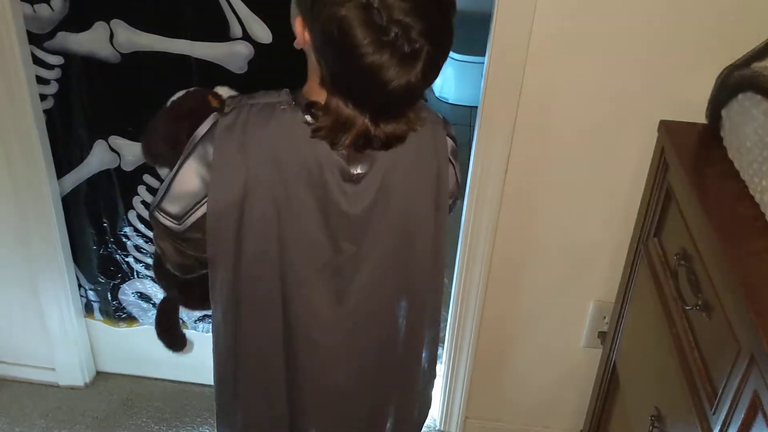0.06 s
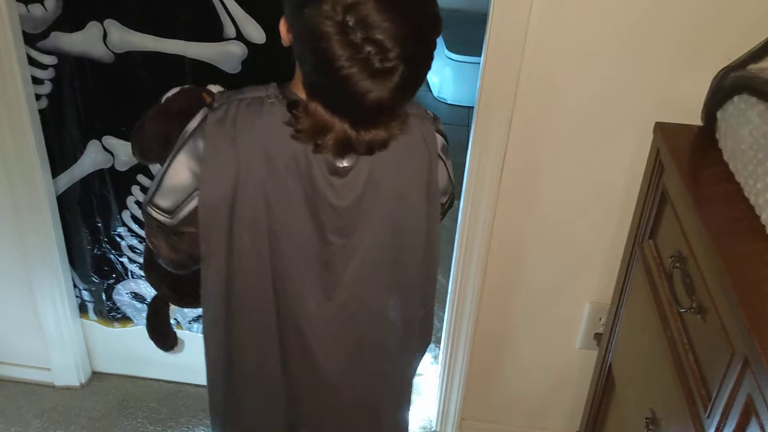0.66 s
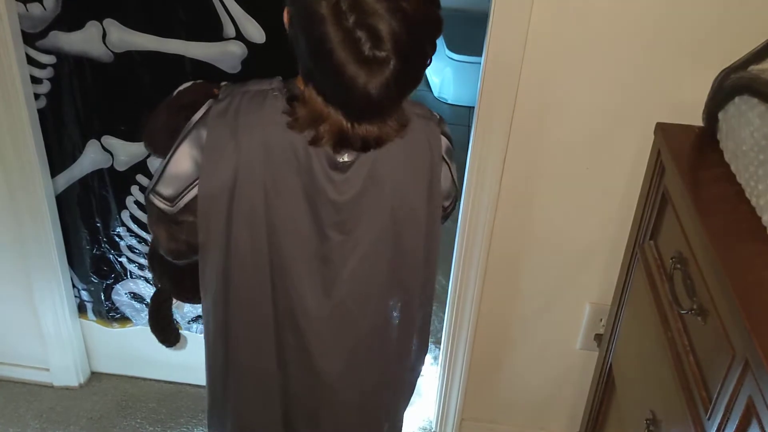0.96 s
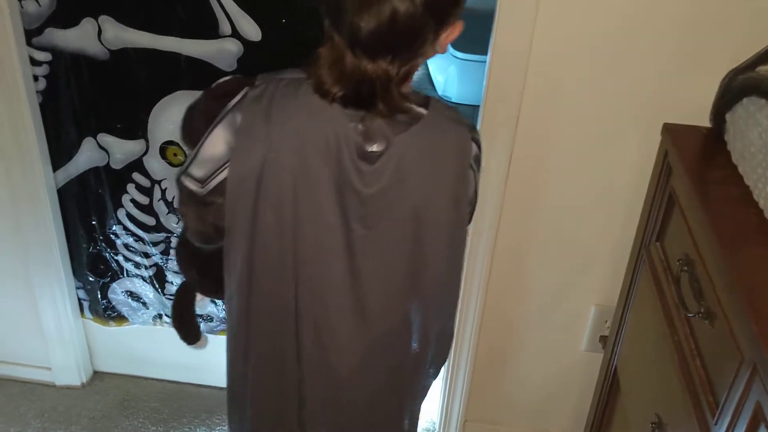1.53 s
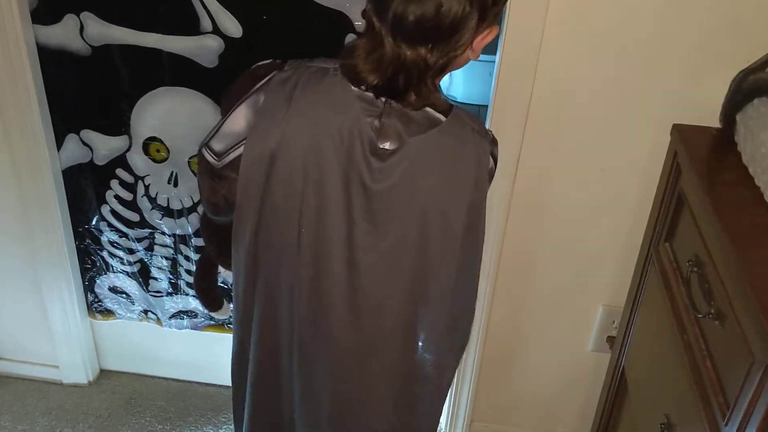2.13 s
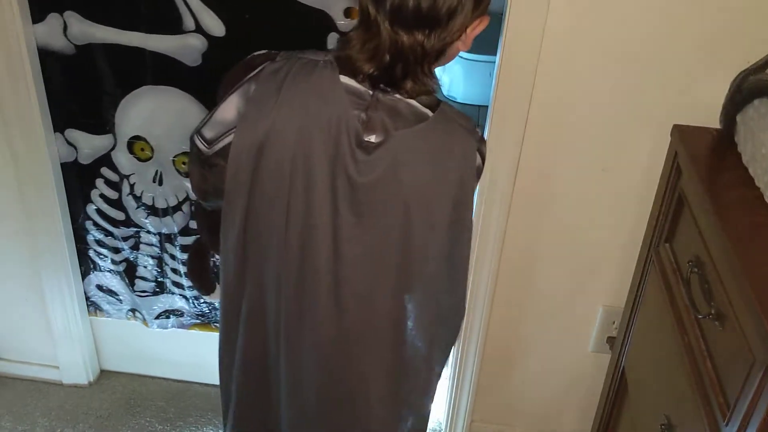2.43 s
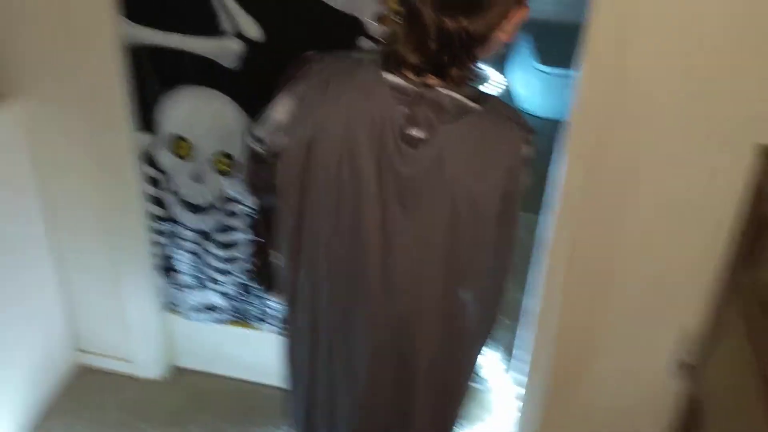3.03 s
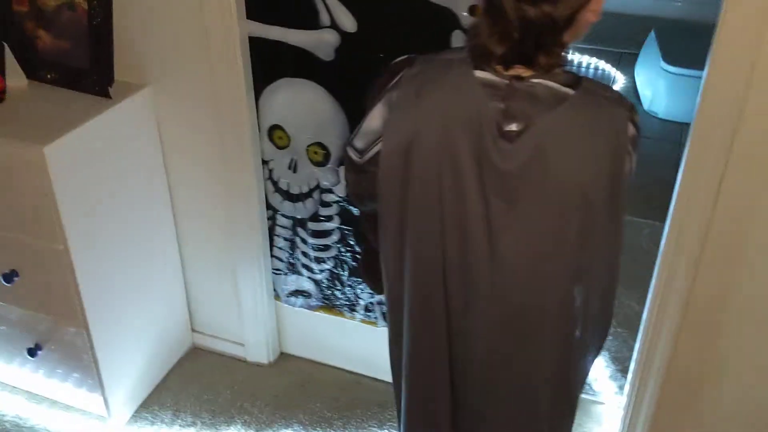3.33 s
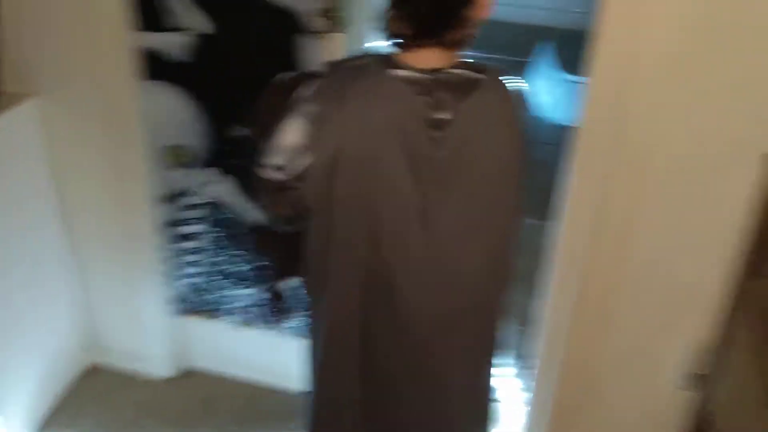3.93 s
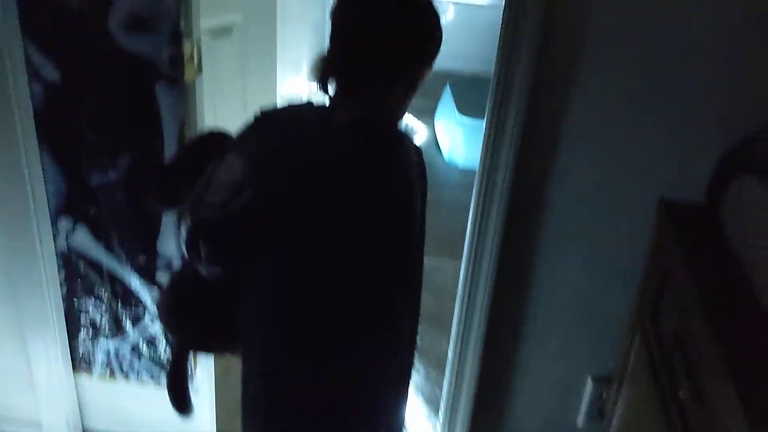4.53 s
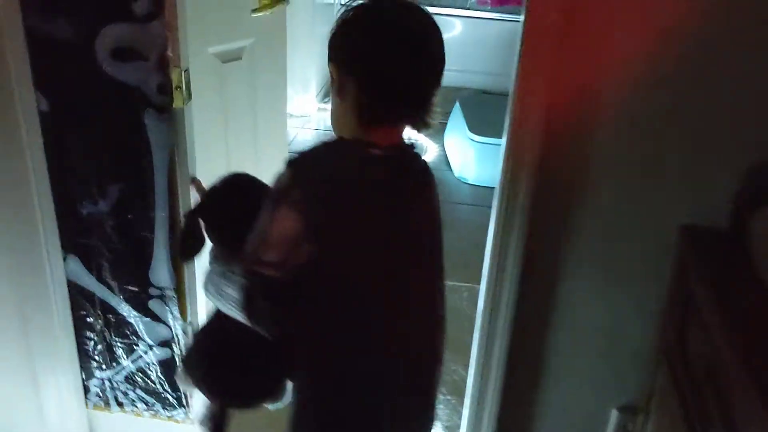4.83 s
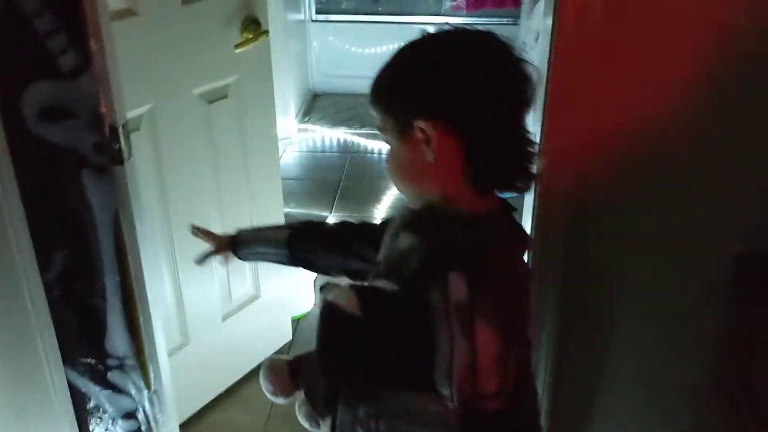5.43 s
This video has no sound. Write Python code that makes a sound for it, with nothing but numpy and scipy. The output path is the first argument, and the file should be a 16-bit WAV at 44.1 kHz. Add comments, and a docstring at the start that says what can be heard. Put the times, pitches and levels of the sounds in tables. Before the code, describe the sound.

Close handling noise, with rubs, clicks and hollow bumps, surrounds a few faint taps on a wooden door over a low house rumble.

```python
"""A quiet hallway, heard from the two microphone ports of a hand-held camera, over a low house rumble.
At once, very close, fingers rub past the right port, skin squeaks and clothes swish; then nails tick
and the hand knocks the case. From 1.5 to 3.7 s, farther off, a child taps faintly on a wooden door,
each tap carrying the hallway's echo. From about 4.6 s the handling grows busy: a fingertip judders
on the case, and the knocks and ticks are hardest just after 5 s."""
import sys
import numpy as np
from scipy import signal
from scipy.fft import rfft, irfft, next_fast_len
from scipy.io import wavfile
from scipy.ndimage import map_coordinates

SR = 44100
rng = np.random.default_rng(int(sys.argv[2]) if len(sys.argv) > 2 else 0)


def persist_wave(psi):
    """Save psi, clipped to +-1, as 16-bit WAV."""
    counts = np.round(np.clip(psi, -1, 1) * 32767).astype(np.int16)
    wavfile.write(sys.argv[1], SR, np.atleast_2d(counts).T)


N = 246145

# the hallway's rumble and hiss over time: time_s, level_db
ROOM_LEVEL = [(0, -54.5), (1.8, -57), (2.4, -55), (3, -55.5), (3.5, -53.5), (5.5, -52)]
# its spectrum: frequency_hz, gain_db
ROOM_SPECTRUM = [(15, -14.5), (35, -5), (56, 2), (85, -11), (125, -14), (200, -15.5), (280, -9), (380, -22),
                 (520, -19), (900, -20.5), (2000, -28), (3500, -28), (7000, -37), (16000, -39)]
# how alike it is at the two ports: frequency_hz, correlation
ROOM_LIKENESS = [(60, 0.98), (130, 0.99), (290, 0.3), (640, 0), (15000, 0)]
# skin sliding on the case: start_s, length_s, hiss_db, scrape_db, drag_db, swell_db
FINGER_STROKES = [(0, 0.11, -56.5, -48, -53, -5.5), (0.132, 0.013, -40, -32.5, -56, 0.5),
                  (0.168, 0.22, -43, -41.5, -44.5, -3.5), (0.397, 0.043, -53.5, -61, -48, -7),
                  (0.705, 0.043, -52.5, -48.5, -44, -15), (0.856, 0.23, -61, -63, -57.5, 1),
                  (1.197, 0.14, -51.5, -56, -55, 14), (1.325, 0.41, -58, -54.5, -52.5, -4.5),
                  (1.455, 0.027, -52.5, -56, -43.5, -3), (1.801, 0.093, -63, -59, -65, -6),
                  (3.587, 0.025, -54, -47, -39.5, -6), (3.67, 0.079, -62, -56.5, -45, -6),
                  (3.752, 0.11, -51.5, -52, -54, 11.5), (3.941, 0.035, -50.5, -54, -54, -3),
                  (4.072, 0.095, -48, -57.5, -48.5, 4), (4.22, 0.12, -50.5, -59, -54, 1),
                  (4.395, 0.26, -55.5, -60.5, -53, 10.5), (4.999, 0.055, -56, -49, -34.5, 0),
                  (5.077, 0.031, -46, -48, -44, 7), (5.16, 0.039, -44.5, -50, -36.5, 1.5),
                  (5.227, 0.024, -39.5, -38, -31, -6), (5.266, 0.019, -36, -26.5, -21.5, -13),
                  (5.287, 0.087, -45, -49.5, -36.5, -6), (5.421, 0.042, -53.5, -55, -32, 8),
                  (5.535, 0.057, -47, -65, -44, 5)]
# spectra of skin hissing at the port, scraping the shell and dragging the case: frequency_hz, gain_db
HISS_SPECTRUM = [(900, -30), (1900, -7.5), (2700, 2.5), (3900, 2.5), (4800, -1), (5700, -0.5), (6700, -6.5),
                 (7800, -5.5), (9700, -5.5), (13000, -2.5), (16000, -5.5)]
SCRAPE_SPECTRUM = [(200, -33), (430, 15), (600, 7), (900, 7), (1200, 0.5), (1700, -1.5), (2200, -7.5),
                   (4000, -21.5)]
DRAG_SPECTRUM = [(30, -8), (70, -4.5), (120, -2), (170, -5), (280, -3), (420, 1), (600, -18), (1000, -69)]
# narrow resonances of the camera's shell: centre_hz, width_hz, boost_db
SHELL_RESONANCES = [(957, 56, 3), (1230, 20, -9), (1610, 140, 5.5), (1810, 29, 0), (2424, 280, 5),
                    (2980, 410, 2.5), (4100, 980, 2.5), (5680, 700, 8.5), (7480, 940, 8), (9650, 1120, 9),
                    (11720, 240, 9)]
# case vibration at the left port, relative to the right: frequency_hz, gain_db
LEFT_PORT_GAIN = [(60, -5), (400, -3.5), (700, -4.5), (1000, -10), (1400, -8.5), (2400, -22.5), (8000, -42)]
# its phase lead at the left port: frequency_hz, lead_rad
LEFT_PORT_LEAD = [(40, 1.14), (90, 1.76), (200, 2.155), (420, 2.495), (700, 2.07), (1000, 1.15),
                  (1400, 0.01)]
# a faint squeak of skin: time_s, level_db
SQUEAK_LEVEL = [(0, -51), (.022, -43.5), (.05, -55), (.11, -51), (.14, -67), (.2, -120)]
# its resonances: centre_hz, half_width_hz, gain_db
SQUEAK_RESONANCES = [(1105, 74, 2), (1460, 110, -2), (2510, 87, -5), (4100, 84, -4), (4430, 57, -22),
                     (5280, 55, -6)]
# clothes moving close to both ports: start_s, length_s, level_db, fizz_share
CLOTH_SWISHES = [(0, 0.12, -59, 0), (3.016, 0.31, -61, 0.3), (3.788, 0.07, -48.5, 0.53),
                 (3.933, 0.04, -64, 0.05), (4.079, 0.093, -54, 0.2), (4.19, 0.15, -60, 0.25),
                 (4.375, 0.2, -65, 0.15), (5.037, 0.11, -52.5, 0.15), (5.16, 0.14, -50, 0.2),
                 (5.258, 0.06, -45, 0.1), (5.4, 0.05, -60, 0.1), (5.54, 0.044, -51.5, 0.1)]
# spectra of soft fabric and of the fizz of quickly sliding cloth: frequency_hz, gain_db
CLOTH_SPECTRUM = [(500, 23), (1800, -15), (3600, 12), (4800, -5), (5700, 2.5), (6800, 3), (9700, 1.5),
                  (13000, 0), (16000, -6)]
FIZZ_SPECTRUM = [(2000, -30), (5000, -11), (7000, -2), (9000, 3), (13000, -2), (16000, -3)]
# hard little contacts of nail and plastic: start_s, level_db, left_minus_right_db, ping_hz
NAIL_TICKS = [(0.1465, -31.5, -29, 2900), (0.18, -38, -25, 2530), (0.268, -31.5, -33, 7900),
              (0.7125, -37.5, -18.6, 2573), (0.779, -63, 12, 9800), (0.812, -65, 11, 9400),
              (1.3268, -31, -22, 1980), (1.555, -45, -11, 3060), (1.81, -47, -24, 2793),
              (3.2946, -46, 0, 3070), (3.5802, -30.5, -11, 2070), (3.5913, -33.5, -21, 2800),
              (3.629, -46, -20, 3840), (3.8724, -43, -2, 5652), (4.208, -43.5, -15, 2600),
              (4.6677, -39.5, -26, 8800), (4.7509, -37.5, -7, 7800), (4.7547, -35.5, -25, 7800),
              (4.9056, -40, -23, 2440), (5.2276, -26, -12, 8660), (5.233, -29, -17, 2520),
              (5.271, -14.5, -29, 7570), (5.3948, -14, -11, 3920), (5.398, -26.5, -23, 3860),
              (5.41, -37, -13, 3130), (5.5114, -33.5, -27, 5540)]
# spectrum of their crack: frequency_hz, gain_db
TICK_SPECTRUM = [(300, -64), (1200, -6), (2000, -0.5), (2700, 0), (3900, 3.5), (4700, -4), (5700, -1.5),
                 (8000, -6), (10000, -1.5), (13000, -8), (16000, -11)]
# the hand knocking the case: start_s, ring_db, ring_hz, thump_db, rap_db, rap_hz
CASE_KNOCKS = [(0.703, -38, 205, -46, -56, 890), (0.708, -68, 210, -43, -35, 1060),
               (0.944, -43, 283, -40.5, -45.5, 820), (1.324, -24, 270, -30.5, -47, 855),
               (1.343, -26.5, 303, -37, -51, 683), (1.351, -26.5, 362, -58, -47, 935),
               (1.47, -38.5, 410, -46, -49, 760), (3.578, -30, 513, -26.5, -39.5, 683),
               (3.592, -36.5, 370, -40, -54, 683), (3.63, -34.5, 392, -37, -43, 690),
               (3.728, -40.5, 254, -45, -51, 880), (3.874, -36, 257, -36, -55, 706),
               (4.564, -38.5, 263, -56, -50, 683), (4.633, -40, 265, -35, -51, 683),
               (4.661, -23.5, 298, -37, -33.5, 810), (4.672, -26, 285, -29, -47, 834),
               (4.907, -19.5, 400, -32, -32, 770), (4.917, -33, 308, -30.5, -52, 850),
               (5.147, -31.5, 342, -40, -36, 744), (5.231, -15.5, 360, -39, -27.5, 750),
               (5.238, -23, 300, -30, -29.5, 694), (5.27, -21, 386, -36, -27, 880),
               (5.4, -22, 305, -28, -44, 910), (5.416, -22.5, 288, -24.5, -48, 850),
               (5.511, -34.5, 346, -47, -49, 716)]
# modes of the case in the hand: pitch_hz, level_db, t60_s
CASE_MODES = [(66.2, 11.5, 0.31), (94.2, 12, 0.12), (123.6, 14.5, 0.19), (189, -5, 0.24), (206.8, -6, 0.11),
              (251.2, -1, 0.14), (290.2, -10.5, 0.16), (333.7, -6, 0.095), (394, 0, 0.035),
              (442, -1, 0.056), (491, -2.5, 0.05), (563.7, -2.5, 0.094), (657, 5, 0.017), (707, 3, 0.063),
              (868, -4.5, 0.12), (901, 4, 0.051), (1082, -3.5, 0.055), (1277, 2.5, 0.045),
              (1590, 8.5, 0.036)]
# the child's taps, away from the microphone: start_s, level_db
DOOR_TAPS = [(1.546, -56), (1.651, -49), (1.81, -50), (1.885, -57), (2.368, -53), (2.803, -56.5),
             (3.296, -70), (3.679, -53.5)]
# spectrum of the wooden panel: frequency_hz, gain_db
DOOR_SPECTRUM = [(150, -35), (350, -3.5), (500, 11.5), (700, -8.5), (1000, 8.5), (1500, -30),
                 (3000, -12.5), (8000, -24.5), (16000, -38)]
# decay of the hallway's echo: frequency_hz, t60_s
HALLWAY_DECAY = [(150, 1), (1000, 0.4), (4000, 0.14), (12000, 0.49)]
# a fingertip sticking and slipping on the case: start_s, length_s, slip_hz, level_db
FINGER_JUDDERS = [(4.696, 0.029, 270, -39.5), (4.798, 0.01, 277, -32.5), (4.878, 0.015, 260, -35.1),
                  (5.005, 0.0061, 323, -24), (5.029, 0.0052, 345.5, -21), (5.037, 0.012, 285, -24.2),
                  (5.108, 0.012, 282, -30), (5.145, 0.016, 355.7, -22.5), (5.278, 0.017, 421, -21.5),
                  (5.359, 0.027, 343, -34), (5.434, 0.014, 351, -25.5), (5.458, 0.0079, 330, -30),
                  (5.497, 0.027, 407, -41.5)]


def amp(db):
    """Decibels to gain."""
    return 10 ** (np.asarray(db) / 20)


def unit(x):
    """x at rms 1."""
    return x / np.sqrt(np.mean(x ** 2) + 1e-20)


def burst(x, seconds):
    """x with the energy of an rms-1 sound of that length."""
    return x * np.sqrt(seconds * SR / (np.sum(x ** 2) + 1e-20))


def fade(t, t60):
    """Exponential decay, 60 dB in t60 seconds."""
    return np.exp(-np.log(1000) * t / t60)


def along(points, hz):
    """Read (frequency_hz, value) points at hz, on a log axis."""
    frequencies, values = np.transpose(points)
    return np.interp(np.log(hz + 1), np.log(frequencies + 1), values)


def gain_curve(points):
    """One gain per sample from (time_s, level_db) points."""
    return amp(np.interp(np.arange(N) / SR, *np.transpose(points)))


def wobble(rate):
    """A smooth random curve, rate knots a second."""
    knots = rng.standard_normal(int(N * rate / SR) + 4)
    return map_coordinates(knots, [np.arange(N) * rate / SR])


def filtered(x, response):
    """x through a complex response of frequency."""
    n = x.shape[-1]
    padded = next_fast_len(n + SR // 8)
    hz = np.fft.rfftfreq(padded, 1 / SR)
    return irfft(rfft(x, padded) * response(hz), padded)[..., :n]


def coloured(x, spectrum):
    """x shaped by a spectrum, at rms 1."""
    return unit(filtered(x, lambda hz: amp(along(spectrum, hz))))


def add(track, start_s, sound):
    """Mix a sound into the track at start_s."""
    start = round(start_s * SR)
    span = track[..., start:start + sound.shape[-1]]
    span += sound[..., :span.shape[-1]]


def peak(hz, centre_hz, width_hz):
    """A resonance's bell, 1 at its centre."""
    return 1 / (1 + (2 * (hz - centre_hz) / width_hz) ** 2)


def shell_db(hz):
    """Boost of the shell's narrow resonances."""
    return sum(db * peak(hz, centre, width) for centre, width, db in SHELL_RESONANCES)


def friction(spectrum, grain_db, grain_rate):
    """Tiny slips of uneven strength, coloured by the shell's resonances."""
    slips = rng.standard_normal(N) * amp(grain_db * wobble(grain_rate))
    return unit(filtered(slips, lambda hz: amp(along(spectrum, hz) + shell_db(hz))))


def stroke(length_s, attack_s, swell_db, t60):
    """Envelope of one slide: it takes hold, swells or eases while it lasts, then dies away."""
    t = np.arange(SR) / SR
    onset = np.clip(t / attack_s, 0, 1)
    progress = np.clip(t / length_s, 0, 1)
    return onset * amp(swell_db * (progress - .5)) * fade(np.maximum(t - length_s, 0), t60)


def room_tone():
    """House rumble fills the hallway, alike at both ports, under a faint hiss that differs at each."""
    def mid_and_side(hz):
        angle = np.arccos(np.clip(along(ROOM_LIKENESS, hz), -1, 1)) / 2
        return np.array([np.cos(angle), np.sin(angle)])

    noise = coloured(rng.standard_normal((2, N)), ROOM_SPECTRUM)
    mid, side = filtered(noise, mid_and_side)
    return gain_curve(ROOM_LEVEL) * unit(np.array([mid + side, mid - side]))


def finger_rubbing(grip_s=0.0066, grip_share=0.044, pressure_swing_db=1.0):
    """Sliding skin hisses right at the port, scrapes on the shell and drags the whole case."""
    hiss, scrape, drag = np.zeros((3, N))
    for start_s, length_s, hiss_db, scrape_db, drag_db, swell_db in FINGER_STROKES:
        attack_s = grip_s + grip_share * length_s
        add(hiss, start_s, amp(hiss_db) * stroke(length_s, attack_s, swell_db, t60=0.08))
        add(scrape, start_s, amp(scrape_db) * stroke(length_s, attack_s, swell_db, t60=0.091))
        add(drag, start_s, amp(drag_db) * stroke(length_s, attack_s, swell_db, t60=0.19))
    pressure = amp(pressure_swing_db * wobble(rate=45))
    return pressure * (hiss * friction(HISS_SPECTRUM, grain_db=1.8, grain_rate=500)
                       + scrape * friction(SCRAPE_SPECTRUM, grain_db=2.0, grain_rate=170)
                       + drag * friction(DRAG_SPECTRUM, grain_db=2.0, grain_rate=78))


def skin_squeak():
    """Dry skin on the case sings briefly in a few narrow resonances."""
    def resonances(hz):
        return sum(amp(db) * peak(hz, centre, 2 * half) for centre, half, db in SQUEAK_RESONANCES)

    return gain_curve(SQUEAK_LEVEL) * unit(filtered(rng.standard_normal(N), resonances))


def clothes(stir_db=-66.5, stir_swing_db=5.5, right_db=-2):
    """Fabric close to the microphone never lies quite still, and now and then swishes."""
    soft = amp(stir_db + stir_swing_db * wobble(rate=3.52))
    bright = np.zeros(N)
    for start_s, length_s, level_db, fizz_share in CLOTH_SWISHES:
        swish = amp(level_db) * stroke(length_s, attack_s=0.24 * length_s, swell_db=4, t60=0.1)
        add(soft, start_s, swish)
        add(bright, start_s, fizz_share * swish)
    left, right = (soft * friction(CLOTH_SPECTRUM, grain_db=5, grain_rate=400)
                   + bright * friction(FIZZ_SPECTRUM, grain_db=4, grain_rate=400) for _ in range(2))
    return np.array([left, amp(right_db) * right])


def nail_ticks(rattle_db=-21, ping_db=-5, slope_db_per_octave=3, shell_share=0.56):
    """A nail meets plastic, mostly nearer the right port: a sharp crack, a brief ping and a rattle."""
    out, t = np.zeros((2, N)), np.arange(SR // 12) / SR
    envelope = fade(t, t60=0.0056) + amp(rattle_db) * fade(t, t60=0.079)
    for start_s, level_db, left_db, ping_hz in NAIL_TICKS:
        def colour(hz):
            off_ping_db = slope_db_per_octave * np.abs(np.log2((hz + 1) / ping_hz))
            return amp(along(TICK_SPECTRUM, hz) + shell_share * shell_db(hz) - off_ping_db)

        cracks = filtered(rng.standard_normal((2, len(t))) * envelope, colour)
        ping = amp(ping_db) * unit(np.sin(2 * np.pi * ping_hz * t) * fade(t, t60=0.0085))
        left, right = (burst(unit(crack) + ping, seconds=0.002) for crack in cracks)
        add(out, start_s, amp(level_db) * np.array([amp(left_db) * left, right]))
    return out


def case_knocks(thump_below_hz=160, rap_above_hz=620, focus_per_octave=1.42, attack_s=0.00051,
                scatter_db=2, detune=0.0272, tail_db=-26):
    """The hand knocks the case: a thump, with a hollow ring and a short rap that depend on the spot."""
    out, t = np.zeros(N), np.arange(SR // 3) / SR
    hz, mode_db, t60 = np.transpose(CASE_MODES)
    thump, rap = hz < thump_below_hz, hz > rap_above_hz
    ring = ~thump & ~rap
    onset = 1 - np.exp(-(t / attack_s) ** 2)
    low_tail = amp(tail_db) * np.outer(~rap, fade(t, t60=0.64))
    decay = fade(t, t60[:, None]) + low_tail
    for start_s, ring_db, ring_hz, thump_db, rap_db, rap_hz in CASE_KNOCKS:
        size, pitch, offset = rng.standard_normal((3, len(hz)))
        # the spot favours the modes near its own pitch; the grip detunes them
        centre_hz = np.where(thump, hz, np.where(ring, ring_hz, rap_hz))
        nearness = np.exp(-(focus_per_octave * np.log2(hz / centre_hz)) ** 2)
        gain = amp(mode_db + scatter_db * size) * nearness
        phase = 2 * np.pi * np.outer(hz * (1 + detune * pitch), t)
        # all modes are pushed the same way at first, then each goes its own way
        push = 0.33 * np.sin(phase) * fade(t, t60=0.0086)
        ringing = np.sin(phase + np.pi * offset[:, None]) * decay
        modes = gain[:, None] * (push + ringing) * onset
        for group, level_db in ((thump, thump_db), (ring, ring_db), (rap, rap_db)):
            add(out, start_s, amp(level_db) * burst(modes[group].sum(axis=0), seconds=0.017))
    return out


def door_taps(echo_db=-2):
    """A child taps the wooden panel some way off; each tap arrives with the hallway's echo."""
    out = np.zeros((2, N))
    for start_s, level_db in DOOR_TAPS:
        hz, frame_s, bands = signal.stft(rng.standard_normal((2, SR // 2)), SR, nperseg=256)
        band_decay = fade(frame_s, along(HALLWAY_DECAY, hz)[:, None])
        _, echo = signal.istft(bands * band_decay, SR, nperseg=256)
        t = np.arange(echo.shape[1]) / SR
        direct = rng.standard_normal(echo.shape) * fade(t, t60=0.045)
        tap = coloured(unit(direct) + amp(echo_db) * unit(echo), DOOR_SPECTRUM)
        add(out, start_s, amp(level_db) * burst(tap, seconds=0.067))
    return out


def finger_judders(rise_s=0.0026, waver=0.089, grip_db=2, overtone_db=-20, knots_per_s=100):
    """A fingertip's quick, even slips shake the case at their own rate, then the shaking dies away."""
    out, t = np.zeros(N), np.arange(SR // 6) / SR
    onset = 1 - np.exp(-(t / rise_s) ** 2)
    for start_s, length_s, slip_hz, level_db in FINGER_JUDDERS:
        drift, grip = (map_coordinates(row, [t * knots_per_s]) for row in rng.standard_normal((2, 20)))
        phase = 2 * np.pi * np.cumsum(slip_hz * (1 + waver * drift)) / SR
        shake = np.sqrt(2) * (np.sin(phase) + amp(overtone_db) * np.sin(2 * phase))
        envelope = onset * fade(np.maximum(t - length_s, 0), t60=0.093)
        add(out, start_s, amp(level_db + grip_db * grip) * envelope * shake)
    return out


def through_case(vibration):
    """The case rocks, so the left port hears its vibration weaker and, in the low mids, nearly inverted."""
    def left_port(hz):
        return amp(along(LEFT_PORT_GAIN, hz)) * np.exp(1j * along(LEFT_PORT_LEAD, hz))

    return np.array([filtered(vibration, left_port), vibration])


def scene():
    """At the microphone: handling through the case, plus what arrives through the air."""
    handling = finger_rubbing() + skin_squeak() + case_knocks() + finger_judders()
    airborne = room_tone() + clothes() + nail_ticks() + door_taps()
    return through_case(handling) + airborne


def record(dry):
    """The camera keeps nothing above its band limit."""
    return filtered(dry, lambda hz: hz < 16200)


dry = scene()
out = record(dry)
persist_wave(out)
```